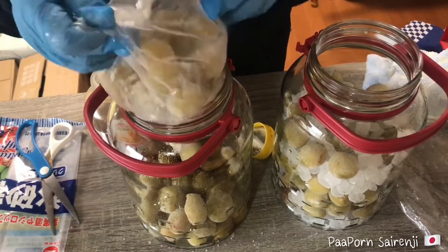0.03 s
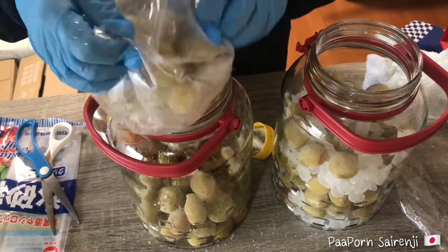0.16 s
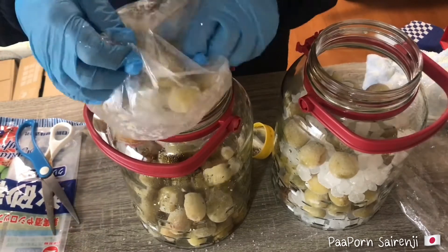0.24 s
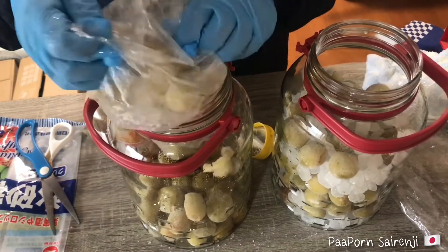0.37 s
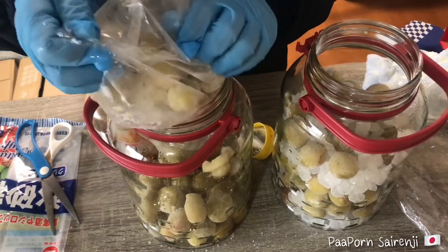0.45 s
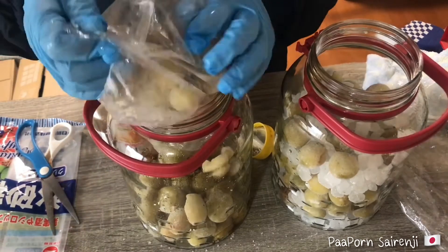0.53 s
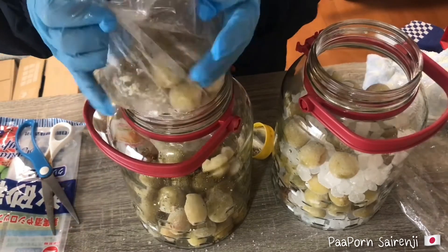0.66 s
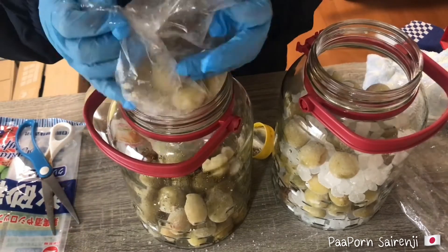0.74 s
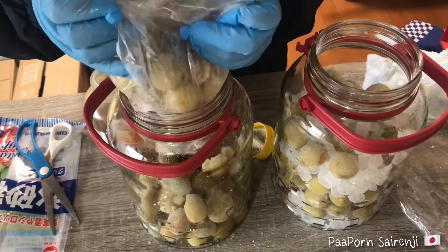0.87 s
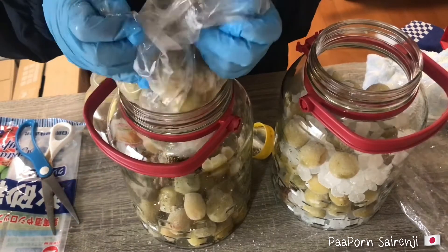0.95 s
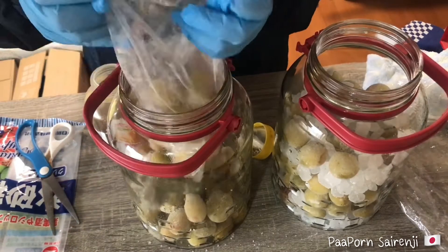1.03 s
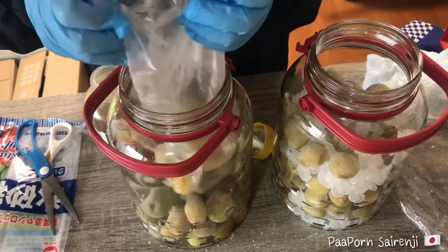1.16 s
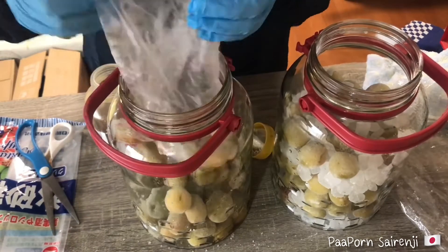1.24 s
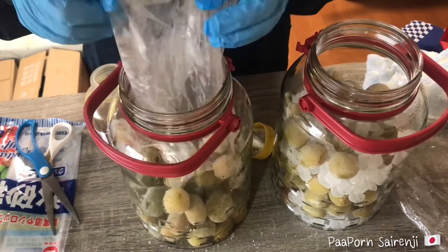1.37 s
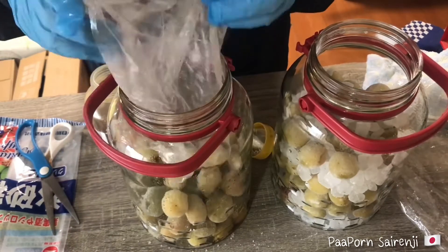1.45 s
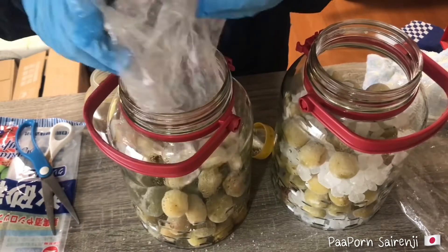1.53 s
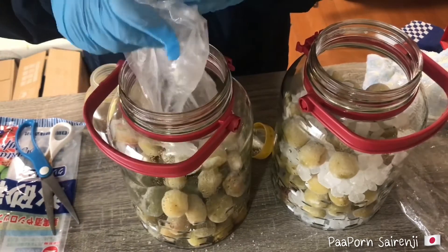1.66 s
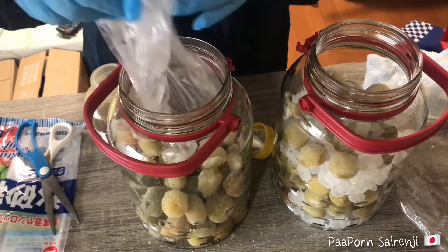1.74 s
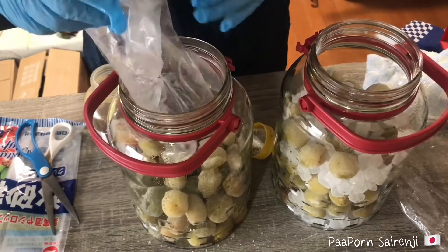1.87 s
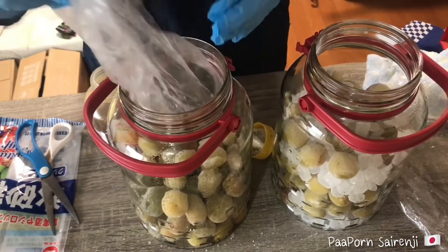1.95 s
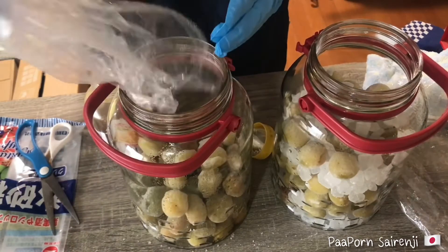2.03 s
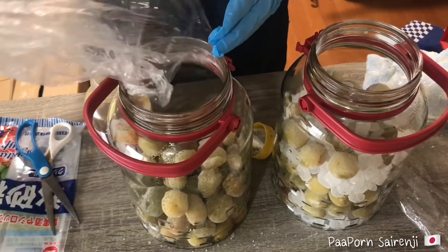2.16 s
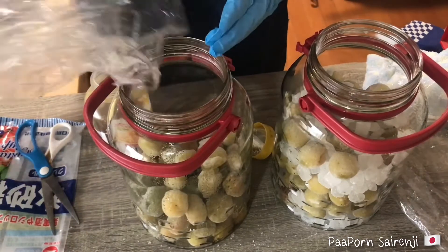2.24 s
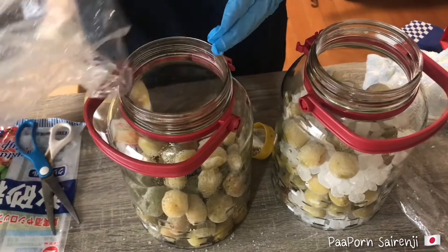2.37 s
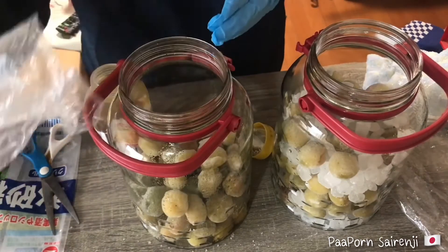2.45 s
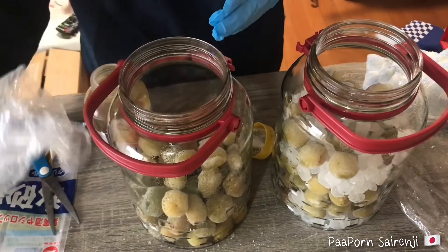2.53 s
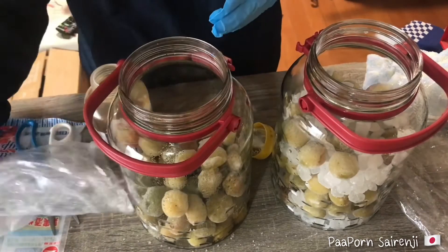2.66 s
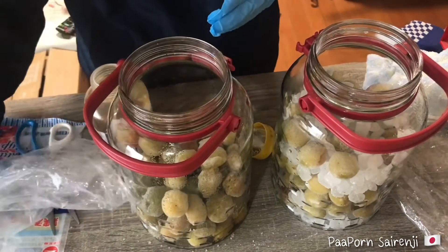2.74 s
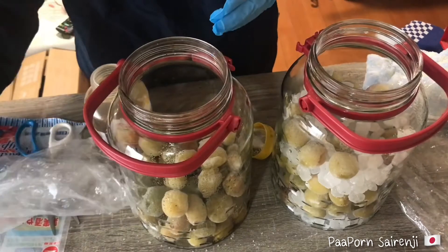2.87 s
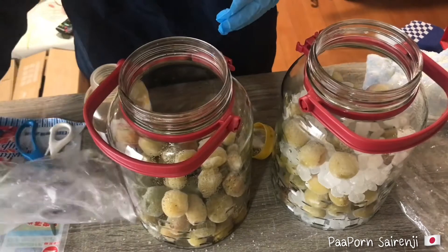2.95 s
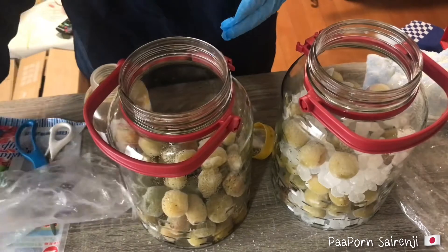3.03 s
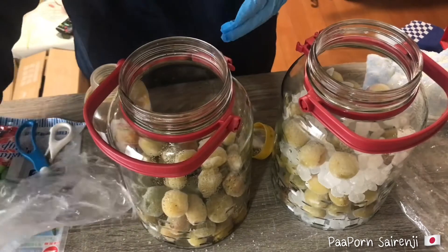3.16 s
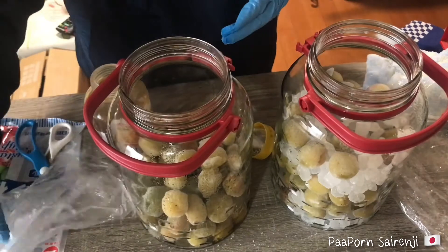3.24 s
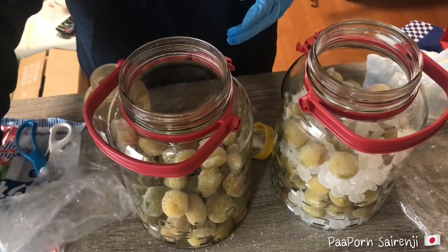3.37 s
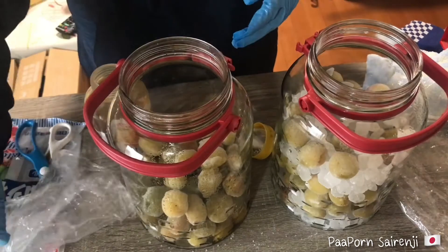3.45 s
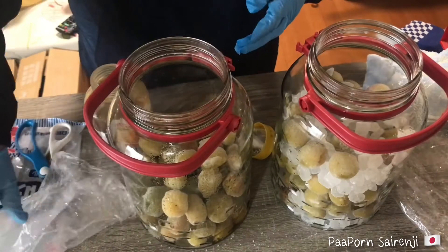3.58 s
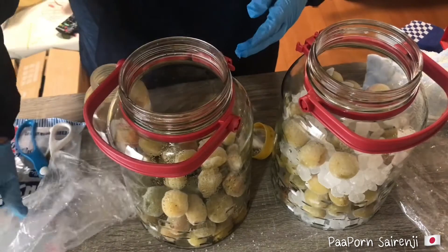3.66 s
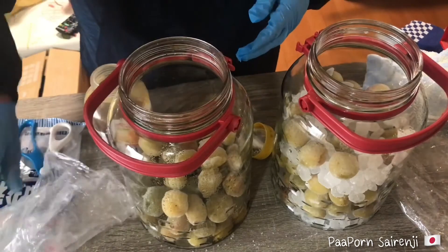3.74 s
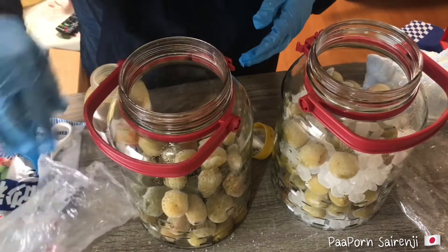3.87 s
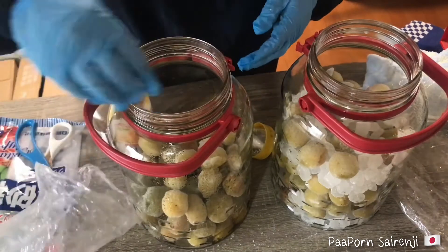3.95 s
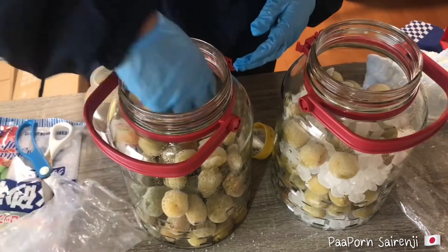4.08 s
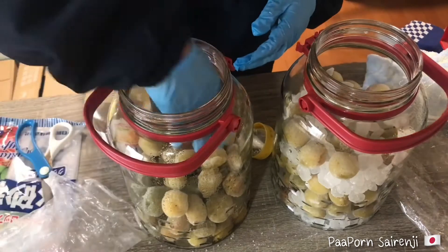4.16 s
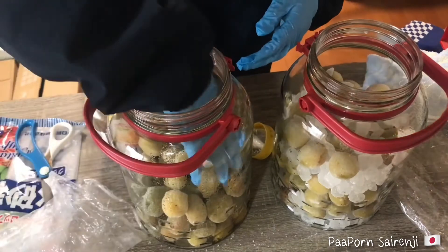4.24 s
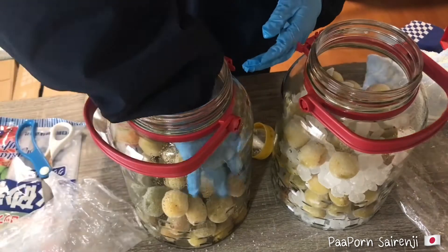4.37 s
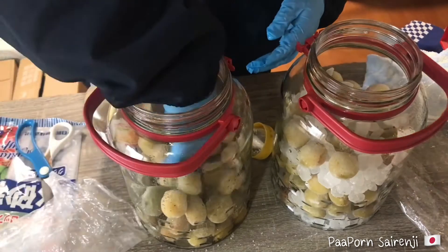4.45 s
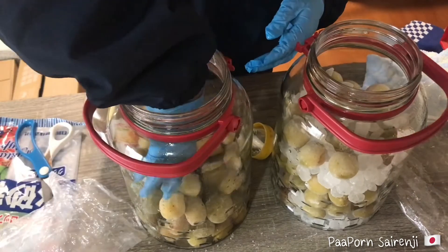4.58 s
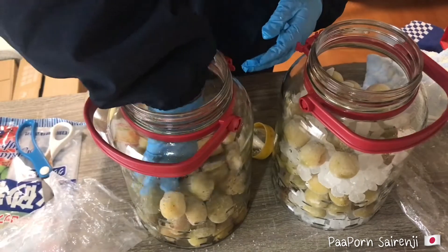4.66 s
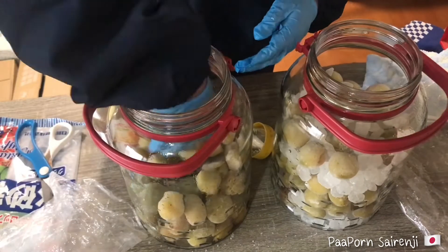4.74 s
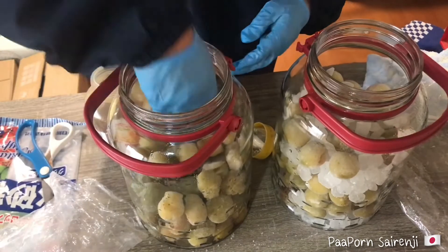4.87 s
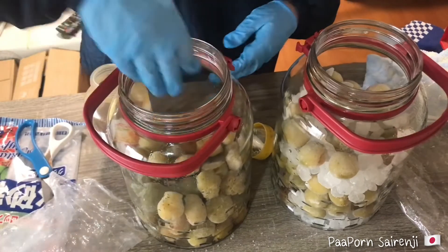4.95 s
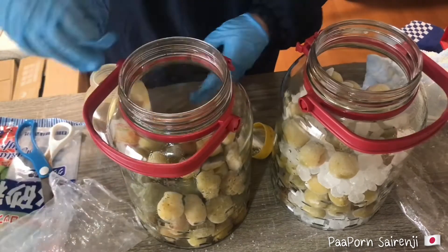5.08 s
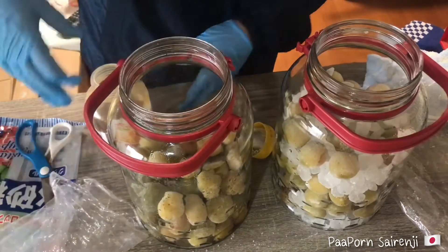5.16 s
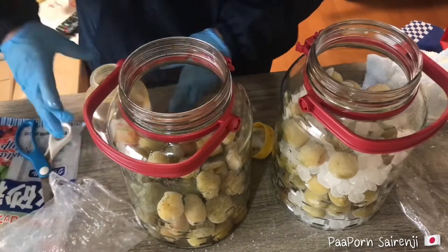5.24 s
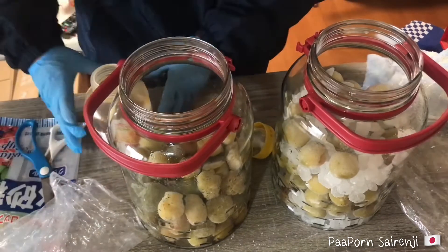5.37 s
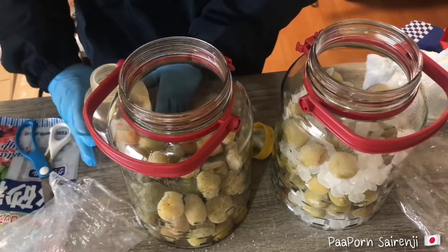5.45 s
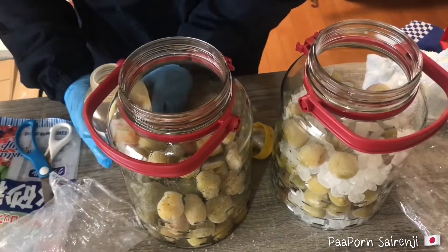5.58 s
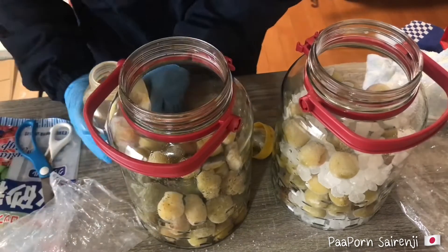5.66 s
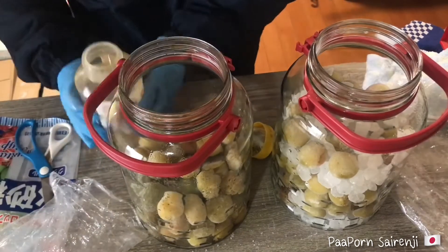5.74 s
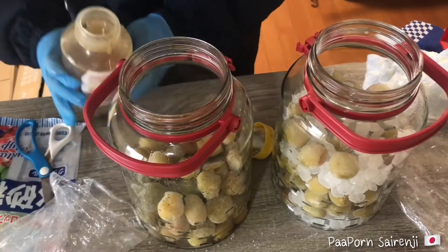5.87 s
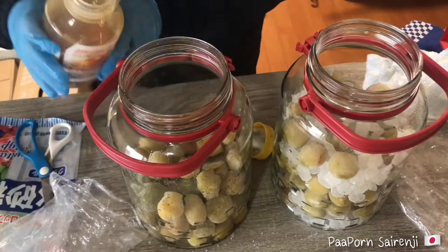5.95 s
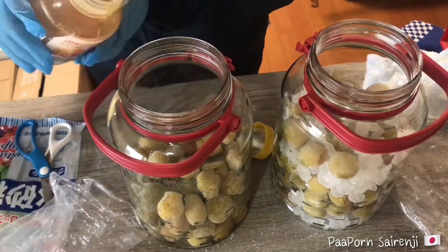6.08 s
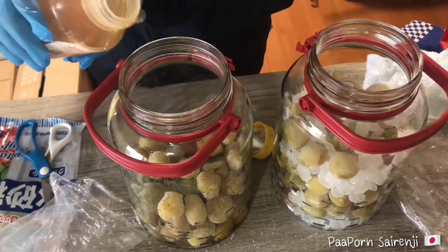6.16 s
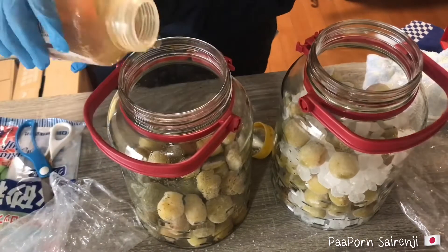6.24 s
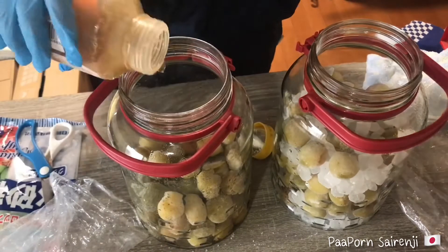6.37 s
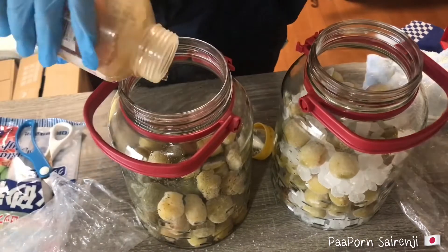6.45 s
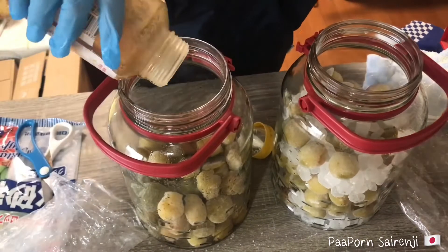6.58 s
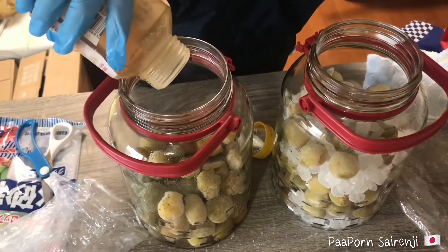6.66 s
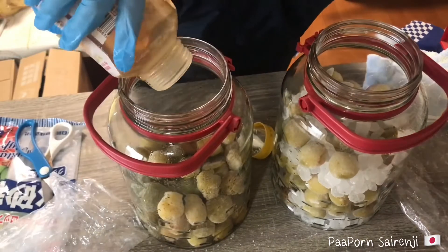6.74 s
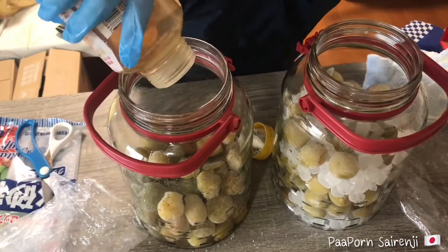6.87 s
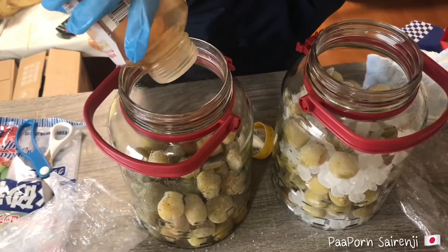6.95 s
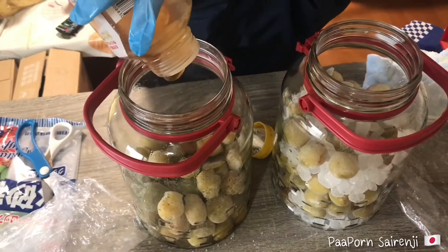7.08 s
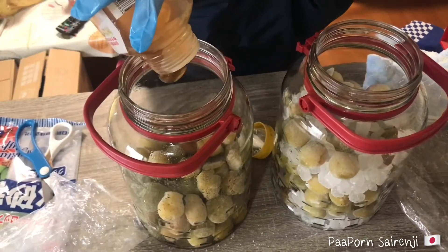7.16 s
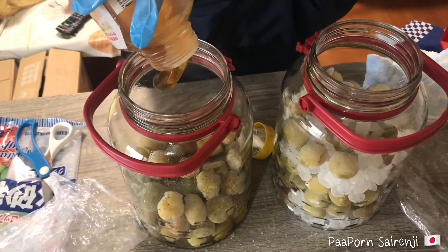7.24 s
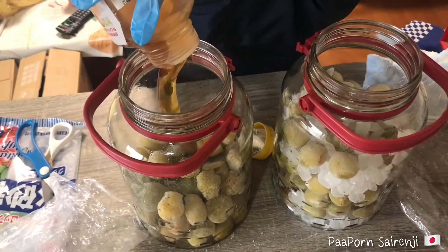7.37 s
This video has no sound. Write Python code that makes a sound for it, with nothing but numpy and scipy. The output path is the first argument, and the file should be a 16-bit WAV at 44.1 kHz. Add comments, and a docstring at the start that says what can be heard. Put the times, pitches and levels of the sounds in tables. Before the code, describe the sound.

Loud crinkling film comes first, with muffled rolling fruit inside it, then a burst of short knocks against thick glass just after one second. The crackle turns hollow in the jar's neck and fades to loose, quiet rustles. After a near-silent pause come soft bumps and a single rattling clack, cloth brushing, and small plastic bottle clicks. Close microphone, short kitchen reverberation, low steady room tone.

```python
"""Frozen fruit tumbles from a thin plastic bag into a big, half-filled glass jar on a kitchen table.
Each knock is a short clack over a weaker glass ring; filtered noise bursts make the soft bumps and rolling.
The bag crackles as random creases buckle, and sounds hollow in the neck as it is pulled out and laid aside.
A gloved hand levels the fruit with one more sharp knock, then picks up a plastic bottle that ticks in its grip.
The microphone hears it all with a short kitchen tail over a quiet background."""
import sys
import numpy as np
from scipy import signal
from scipy.fft import rfft, irfft
from scipy.io import wavfile
from scipy.ndimage import uniform_filter1d

SR = 44100
rng = np.random.default_rng(int(sys.argv[2]) if len(sys.argv) > 2 else 0)


def digitize_waveform(pressure):
    """Quantize a signal to 16-bit integers and store it at the path in sys.argv[1].

    Rows of a 2-D input are taken as channels; values are limited to [-1, 1].
    """
    field = np.atleast_2d(pressure).T
    bounded = np.clip(field, -1, 1)
    quanta = np.round(bounded * 32767).astype(np.int16)
    wavfile.write(sys.argv[1], SR, quanta)


N = 326775
TIME, FREQS = np.arange(N) / SR, np.fft.rfftfreq(N, 1 / SR)

# colour of the quiet kitchen: pitch_hz [Hz], level_db [dB, relative]
QUIET_COLOUR = [(15, -36.5), (25, -13.5), (53, -2.5), (117, -10), (157, -5.5), (200, -8), (263, -10.5),
                (285, -9), (451, -17), (560, -17.5), (2280, -23.5), (7000, -32), (16000, -36)]
# decay of the kitchen's reflections: pitch_hz [Hz], t60_s [s]
KITCHEN_DECAY = [(150, 0.2), (1000, 0.63), (4000, .38), (9000, 0.35), (16000, 0.073)]
# sleeves and gloves brushing smoothly: start_s [s], level_db [dB]
SLEEVE_LEVEL = [(3.9, -63.5), (4.95, -68.5), (5.04, -57.5), (5.2, -60), (5.4, -60.5), (6.1, -57),
                (6.7, -79)]
# colour of the brushing cloth: pitch_hz [Hz], level_db [dB, relative]
SLEEVE_COLOUR = [(300, 2), (1500, 0.5), (5000, -1.5), (10000, -5.5), (13000, -4.5), (16000, 0.5)]
# the bottle sliding off the table: start_s [s], level_db [dB, relative]
BOTTLE_SLIDE = [(5.6, -92), (5.635, -56), (5.665, -61), (5.71, -71)]
# the bag rubbing through the neck stirs the air in the jar:
# start_s [s], pitch_hz [Hz], level_db [dB, before scaling by effort]
NECK_HOLLOW = [(1.4, 264, -24), (1.75, 255, -29.5), (1.99, 240, -18), (2.25, 285, -25.5), (2.45, 315, -23)]
# each squeeze or tug of bag and gloves: start_s [s], hold_s [s], level_db [dB, relative]
GRIPS = [(.08, .05, -39.5), (.14, .07, -32.5), (.33, 0.047, -35), (.55, 0.067, -37), (.695, 0.062, -38),
         (.8, .13, -36), (.995, 0.17, -31.5), (1.225, .035, -36), (1.431, .04, -45.5), (1.51, .255, -39.5),
         (1.827, .025, -42), (1.92, 0.028, -42), (2.283, .018, -53.5), (2.415, .1, -51.5),
         (2.675, .1, -49.5), (3.055, .025, -51), (3.17, 0.054, -46.5), (3.25, 0.038, -49.5),
         (3.88, .012, -56.5), (3.985, 0.058, -51.5), (4.425, .17, -59), (5.475, .15, -56),
         (5.762, 0.037, -56), (5.905, .04, -57)]
# film sliding between grips: start_s [s], level_db [dB, relative]
FILM_SLIDING = [(0, -43.5), (.15, -40), (1.22, -39), (1.35, -48.5), (1.7, -47), (2.12, -57), (2.22, -67),
                (2.6, -59.5), (2.8, -53.5), (3.25, -53.5), (3.55, -61.5), (3.75, -73.5), (4.9, -75.5)]
# colour of the plastic film: pitch_hz [Hz], level_db [dB, relative]
FILM_COLOUR = [(280, -20), (380, -5), (850, -7), (1300, -3), (1850, -4), (4200, -3), (4900, -6), (6100, -6),
               (9300, -8), (10400, -10), (12000, -5.5), (16000, -4.5)]
# how taut the film is, higher being brighter: start_s [s], body_cut_db [dB, negative adds body]
FILM_TAUTNESS = [(0, 0), (1.1, -1.5), (1.6, 1), (2.1, -5), (4, -5.5), (4.6, -9.5), (5.2, -13), (5.55, -5.5)]
# loudest buckles of plastic, film or bottle wall: start_s [s], level_db [dB, relative], brightness_hz [Hz]
SNAPS = [(0.1316, -12, 5700), (0.2712, -14, 7200), (0.342, -13, 7200), (0.3546, -18, 10700),
         (0.4026, -19.5, 8300), (0.482, -17, 8300), (0.502, -17, 6800), (0.6212, -9.5, 6650),
         (0.693, -9.5, 7500), (0.732, -10, 4340), (0.8042, -15, 7200), (0.8195, -14, 6000),
         (1.0042, -13, 7500), (1.4683, -12, 7900), (2.176, -29.5, 4800), (2.686, -25, 5100),
         (2.8966, -24, 9000), (3.0531, -22.5, 6100), (3.2587, -28, 6320), (3.3447, -42, 3260),
         (3.4881, -35, 6650), (3.587, -28.5, 8000), (3.8827, -31, 4540), (4.021, -33.5, 4500),
         (5.485, -19.5, 11400), (5.6, -20.5, 8700), (5.7624, -29.5, 3700), (5.86, -31, 6400),
         (5.9058, -20, 8200), (5.9342, -26.5, 3900), (5.9609, -20, 5230), (6.405, -30.5, 6300),
         (7.1538, -18, 4500), (7.2823, -38.5, 9540)]
# colour of rolling fruit: pitch_hz [Hz], level_db [dB, relative]
TUMBLE_COLOUR = [(40, -31.5), (70, -14), (105, -4.5), (160, -3), (220, -2), (330, -7), (450, -15.5),
                 (900, -17.5), (1500, -14.5), (4000, -24), (16000, -78.5)]
# soft bumps of fruit, hand and bottle: start_s [s], level_db [dB, relative], weight_hz [Hz]
THUDS = [(0.194, -22.5, 630), (0.871, -27, 417), (1.036, -29, 360), (1.207, -19, 806), (3.982, -36, 302),
         (4.423, -29, 537), (4.474, -28, 520), (4.525, -28, 400), (4.597, -32.5, 800), (4.633, -29, 745),
         (4.699, -28, 416), (4.826, -42, 400), (4.843, -41.5, 500), (4.992, -32, 645), (5.097, -36.5, 400),
         (6.382, -39, 228), (6.533, -48.5, 190)]
# colour of a soft bump: pitch_hz [Hz], level_db [dB, relative]
THUD_COLOUR = [(50, -27), (100, -2.5), (220, -4.5), (350, -6), (500, -5), (900, 0.5), (1400, 4),
               (3000, -22.5), (10000, -52.5)]
# resonances of the table under the jar: pitch_hz [Hz], width_hz [Hz], level_db [dB]
TABLE_MODES = [(104, 24, -1.5), (181, 24, -2), (344.2, 30, 5.5)]
# modes of the loaded jar: pitch_hz [Hz], level_db [dB, relative], t60_s [s, undamped]
GLASS_MODES = [(1349, -11.5, 0.17), (1560, -11, 0.12), (1695, 1, 0.15), (1840, -9, .1), (1974, 5.5, 0.13),
               (2033, 0, 0.21), (2130, -16.5, 0.37), (2436, -18, 0.069), (2540, -16, 0.24),
               (2782, -1.5, 0.16), (2650, 4.5, 0.24), (3780, -12, .14), (3863, 5, 0.12), (3830, -8.5, 0.14),
               (4350, -5.5, 0.076), (5380, -13, 0.13), (5480, -8, 0.31), (6730, -15, .24),
               (7200, -7.5, .32), (11500, -23.5, .12)]
# fruit striking the glass: start_s [s], peak_db [dB, dry], contact_hz [Hz, highest pitch excited],
# ring_db [dB, relative], rattle_s [s, how long it rattles on]
KNOCKS = [(0.192, -12, 2140, -3, .03), (0.845, -17, 2080, -7, 0), (0.959, -11.5, 3380, 2.5, .015),
          (1.093, -16.5, 2100, 2, 0), (1.126, -8.5, 3600, 3.5, .045), (1.175, -11, 2400, 12.5, 0),
          (1.1951, -1.5, 3600, -1.5, 0), (1.2225, -5, 6000, 2.5, .015), (1.296, -4, 2013, -15, 0),
          (1.449, -18.5, 2190, -6, 0), (4.443, -21, 1906, -1, 0), (4.4755, -19, 1900, -6, 0),
          (4.514, -6, 11000, -4.5, .07), (4.597, -20, 2000, -9, 0), (4.632, -26, 1890, -13, 0),
          (4.7, -32, 1600, -11, .03)]

QUIET_DB, EDGE_HZ = -60, 16100
# the bag is drawn out of the neck; the hollow follows the effort in dB per dB
PULL_START_S, PULL_HOLD_S, PULL_EDGE_S, HOLLOW_FOLLOW = 1.5, 0.92, .06, 0.56
# a grip builds quickly, then the film relaxes
GRIP_RISE_S, GRIP_RELEASE_S = 0.0086, .017
# fruit rolls while the bag that holds it is shaken; the level is relative to the handling
BAG_EMPTY_S, EMPTYING_S, SHAKEN_DB = 1.7, 0.18, -11.5
# it also stirs around every bump: STIR_DB at a bump of STIR_BUMP_DB, spread in time, dB per dB of bump
STIR_BUMP_DB, STIR_DB, STIR_S, STIR_FOLLOW = -25, -44.5, 0.041, 1.3
# most of the fruit drops at once
POUR_START_S, POUR_HOLD_S, POUR_RISE_S, POUR_SETTLE_S, POUR_DB = 1.092, .12, 0.29, 0.13, -41.5
HAND_IN_S, HAND_OUT_S = 4.15, 4.95  # the hand is in the jar between these times
# a rattling fruit comes back in softer contacts, all of one medium hardness
REBOUND_GAP_S, REBOUND_LOSS_DB, REBOUND_FADE_DB_PER_S, REBOUND_HZ = .0125, 10, 141.5, 2200


def amp(db):
    """Decibels to gain."""
    return 10 ** (np.asarray(db) / 20)


def unit(x):
    """Scales to rms 1."""
    return x / np.sqrt(np.mean(x ** 2) + 1e-20)


def read(points, hz):
    """Reads a spectrum on a log-frequency axis."""
    f, value = np.transpose(points)
    return np.interp(np.log(hz + 1), np.log(f + 1), value)


def follow(rows, axis=1):
    """One column of a curve at every sample."""
    rows = np.array(rows)
    return np.interp(TIME, rows[:, 0], rows[:, axis])


def loudness(rows):
    """Gain along a level curve, silent outside it, with softened ends."""
    inside = (TIME >= rows[0][0]) & (TIME <= rows[-1][0])
    return amp(follow(rows)) * abs(uniform_filter1d(inside * 1., size=400))


def swell(start, hold, rise_s, release_s):
    """Attack, hold and release of one movement."""
    before = np.maximum(start - TIME, 0)
    after = np.maximum(TIME - start - hold, 0)
    return np.exp(-before / rise_s - after / release_s)


def add(mix, s, sound):
    """Mixes a sound in at time s."""
    part = mix[max(round(s * SR), 0):][:len(sound)]
    part += sound[:len(part)]


def colour(x, points):
    """Filters by a spectrum."""
    return irfft(rfft(x) * amp(read(points, FREQS)), N)


def click(gain_db, size=2048):
    """The shortest causal (minimum-phase) pulse with the spectrum gain_db(Hz)."""
    hz = abs(np.fft.fftfreq(size, 1 / SR)) + 1
    log_gain = np.log(amp(np.maximum(gain_db(hz), -100)))
    spectrum = np.exp(np.conj(signal.hilbert(log_gain)))
    return np.fft.ifft(spectrum).real[:size // 2]


def blow(noise, after_db, after_s):
    """One impulse followed by a dying rattle."""
    t = np.arange(len(noise)) / SR
    rattle = noise * np.exp(-t / after_s) * (t > 0)
    return (t == 0) + amp(after_db) * rattle / np.linalg.norm(rattle)


def resonate(x, hz, width_hz):
    """A resonance of gain 1 that can follow a pitch curve."""
    turn = np.exp(2j * np.pi * np.cumsum(hz * np.ones(N)) / SR)
    r = np.exp(-np.pi * width_hz / SR)
    # shift the pitch to zero, smooth, and shift back
    return 2 * (turn * signal.lfilter([1 - r], [1, -r], x / turn)).real


def rubbing(gain, hz, width_hz):
    """Friction noise passed twice through one hollow resonance."""
    once = resonate(rng.standard_normal(N), hz, width_hz)
    return gain * unit(resonate(once, hz, width_hz))


def sparks(per_s, spread_db):
    """Random impulses of either sign, most small and a few large; same power at any rate."""
    size = amp(spread_db * np.minimum(rng.exponential(1, N), 3.6))
    sign = rng.choice([-1, 1], N)
    return size * sign * (rng.random(N) < per_s / SR) / np.sqrt(per_s)


def quiet_kitchen():
    """Steady coloured noise, the background of the place."""
    return amp(QUIET_DB) * unit(colour(rng.standard_normal(N), QUIET_COLOUR))


def kitchen(x, tail_db):
    """Adds sparse reflections from table, jars and small room, strongest early and fading by pitch."""
    t = np.arange(SR // 2) / SR
    taps = rng.choice([-1., 1.], len(t)) * (rng.random(len(t)) < 6000 / SR) * (t > .003)
    early = 1 + 2.0 * np.exp(-t / 0.013)
    hz, age, z = signal.stft(taps * early, SR, nperseg=256)
    decay = amp(-60 * age / read(KITCHEN_DECAY, hz)[:, None])
    tail = signal.istft(z * decay, SR, nperseg=256)[1]
    return x + amp(tail_db) * signal.fftconvolve(x, tail / np.linalg.norm(tail))[:N]


def sleeves():
    """Cloth and gloves brush as smooth coloured noise."""
    return loudness(SLEEVE_LEVEL) * unit(colour(rng.standard_normal(N), SLEEVE_COLOUR))


def bottle_slide():
    """Friction of the bottle leaving the table sounds through one resonance."""
    return rubbing(amp(6.0) * loudness(BOTTLE_SLIDE), hz=494, width_hz=136)


def neck_hollow(motion):
    """The bag rubbing through the neck drives a hollow resonance of moving pitch."""
    pull = swell(PULL_START_S, PULL_HOLD_S, PULL_EDGE_S, PULL_EDGE_S)
    gain = amp(follow(NECK_HOLLOW, axis=2)) * motion ** HOLLOW_FOLLOW * pull
    return rubbing(gain, follow(NECK_HOLLOW), width_hz=117)


def handling():
    """How hard the film is worked: the separate grips over film sliding."""
    grips = sum((amp(db) * swell(s, hold, GRIP_RISE_S, GRIP_RELEASE_S)) ** 2 for s, hold, db in GRIPS)
    return np.sqrt(grips + loudness(FILM_SLIDING) ** 2)


def bag(motion, creases_per_s=200, crowding=.65, spread_db=5.5, clump_db=0.44, facet_db=10,
        facet_octaves=0.45, flutter_db=-3, rub_db=-9, level_db=-1, count=16):
    """Facets of film buckle in clumps, each with its own colour, over the dull hiss of film sliding on film."""
    # slow handling leaves gaps between creases
    per_s = creases_per_s * (motion / motion.max()) ** crowding + 10
    crackle = np.zeros(N)
    for facet_hz in np.geomspace(700, 15000, count):
        facet = click(lambda f: facet_db * np.exp(-(np.log2(f / facet_hz) / facet_octaves) ** 2))
        flutter = blow(rng.standard_normal(250), after_db=flutter_db, after_s=0.0041)
        crease = np.convolve(facet, flutter)
        crackle += signal.oaconvolve(sparks(per_s, spread_db), crease)[:N]
    rub = colour(rng.standard_normal(N), [(1500, 2.5), (4000, -2), (12000, -1.5)])
    wander = uniform_filter1d(uniform_filter1d(rng.standard_normal(N), size=260), size=120)
    clumps = np.clip(unit(wander), -2, 2)
    film = colour(unit(crackle * amp(clump_db * clumps)) + amp(rub_db) * rub, FILM_COLOUR)
    # level is set by the treble band
    treble = irfft(rfft(film) * ((FREQS > 6000) & (FREQS < 15000)), N)
    film /= np.std(treble)
    # taut film is bright; slack film flaps with more body
    body = colour(film, [(3000, -2.5), (6000, -4.5), (11000, -19.5)])
    return amp(level_db) * motion * (film + body * (amp(-follow(FILM_TAUTNESS)) - 1))


def snaps(below_db=6.0, above_db=8, flutter_db=-3, flutter_s=0.0013, level_db=1):
    """A crease flips over with one sharp pulse, and the sheet flutters for a moment."""
    out = np.zeros(N)
    for (s, db, hz), noise in zip(SNAPS, rng.standard_normal((len(SNAPS), 600))):
        # the spectrum falls away on both sides of the brightness
        pulse = click(lambda f: -np.where(f < hz, below_db, above_db) * abs(np.log2(f / hz)) ** 1.5)
        flutter = blow(noise, flutter_db, flutter_s)
        add(out, s, amp(db + level_db) * np.convolve(flutter, pulse / abs(pulse).max()))
    return out


def tumble(motion, bumps_per_s=260, spread_db=3):
    """Many small bumps as the fruit rolls in the shaken bag and shifts in the heap."""
    bump = click(lambda f: read(TUMBLE_COLOUR, f))
    bumps = signal.oaconvolve(sparks(bumps_per_s, spread_db), bump)[:N]
    emptying = np.exp(-np.maximum(TIME - BAG_EMPTY_S, 0) / EMPTYING_S)
    shaken = amp(SHAKEN_DB) * motion * emptying
    stirred = np.zeros(N)
    for s, db, _ in THUDS:
        stir_db = STIR_DB + STIR_FOLLOW * (db - STIR_BUMP_DB)
        stirred += (amp(stir_db) * swell(s, 0, STIR_S, STIR_S)) ** 2
    pour = amp(POUR_DB) * swell(POUR_START_S, POUR_HOLD_S, POUR_RISE_S, POUR_SETTLE_S)
    return unit(bumps) * np.sqrt(shaken ** 2 + stirred + pour ** 2)


def thuds(settle_s=0.008, rattle_db=0, reach=1.1, level_db=-1):
    """A dull push followed by the heap settling, which takes longer after a heavy, low one."""
    out = np.zeros(N)
    for (s, db, hz), noise in zip(THUDS, rng.standard_normal((len(THUDS), SR // 4))):
        push = click(lambda f: read(THUD_COLOUR, f) - 10 * np.log10(1 + (f / (reach * hz)) ** 4))
        settling = blow(noise, rattle_db, settle_s * 500 / hz)  # settle_s holds at 500 Hz
        add(out, s, amp(db + level_db) * signal.fftconvolve(settling, push / abs(push).max()))
    return out


def table(bumps):
    """The bumps set off the resonances of the table under the jar."""
    return sum(amp(db) * resonate(bumps, hz, width_hz) for hz, width_hz, db in TABLE_MODES)


def contacts(count=6):
    """Every knock and its uneven rebounds: start_s, peak_db, contact_hz, ring_db."""
    rows = []
    unevenness = rng.uniform(-.25, .25, (len(KNOCKS), count))
    for (s, db, hz, ring_db, rattle_s), uneven in zip(KNOCKS, unevenness):
        rows.append((s, db, hz, ring_db))
        rebounds = min(int(rattle_s / REBOUND_GAP_S), count - 1)
        for k in range(1, rebounds + 1):
            late = (k + uneven[k]) * REBOUND_GAP_S
            late_db = db - REBOUND_LOSS_DB - REBOUND_FADE_DB_PER_S * late
            rows.append((s + late, late_db, REBOUND_HZ, ring_db))
    return rows


def jar(place_db=0.5, clack_db=3, clack_t60=.025, ring_db=-10, glove_damping=0.18, rise_cycles=4,
        tick_db=-6, tick_s=0.0023, chatter_db=5, chatter_s=0.0044):
    """Each fruit gives a short clack and a weaker lasting ring; soft contacts favour the low modes."""
    out, t = np.zeros(N), np.arange(SR // 2) / SR
    hz, mode_db, t60 = np.transpose(GLASS_MODES)[:, :, None]
    hits = contacts()
    places = rng.standard_normal((len(hits), 3, len(GLASS_MODES), 1))
    grits = rng.standard_normal((len(hits), len(t)))
    for (s, db, contact_hz, free_db), (place, shift, phase), grit in zip(hits, places, grits):
        weight = amp(mode_db + place_db * place) / np.sqrt(1 + (hz / contact_hz) ** 8)
        # an arm in the neck damps the low bending modes
        held = HAND_IN_S < s < HAND_OUT_S
        life = t60 * np.where(held & (hz < 5000), glove_damping, 1)
        # fruit pressed on the wall detunes the modes and soaks up most of the blow at once
        clack_wave = np.sin(2 * np.pi * (hz + 70 * shift) * t + np.pi * phase)
        clack = amp(clack_db - 60 * t / clack_t60) * clack_wave
        ring_wave = np.sin(2 * np.pi * (hz + 6 * shift) * t + np.pi * phase)
        ring = amp(ring_db + free_db - 60 * t / life) * ring_wave
        onset = 1 - np.exp(-t * contact_hz / rise_cycles)
        knock = (weight * (clack + ring)).sum(0) * onset
        # the icy skin of the fruit adds a gritty crack
        skin = signal.butter(2, contact_hz, fs=SR)
        knock += amp(tick_db) * signal.lfilter(*skin, grit * np.exp(-t / tick_s))
        # neighbours in the heap chatter against each other
        heap = signal.butter(2, [1300, 1400 + contact_hz / 2], "band", fs=SR)
        chatter = signal.lfilter(*heap, grit[::-1])
        knock += amp(chatter_db) * chatter * np.exp(-t / chatter_s) * (1 - np.exp(-t / tick_s))
        add(out, s, amp(db) * knock / abs(knock).max())
    return out


def scene():
    """All the handling, heard in the kitchen over its quiet background."""
    motion = handling()
    plastic = kitchen(bag(motion), tail_db=-11.5) + kitchen(snaps(), tail_db=-11.5)
    bumps = thuds() + tumble(motion)
    fruit = kitchen(jar(), tail_db=-10.5) + kitchen(bumps + table(bumps), tail_db=-4.5)
    friction = neck_hollow(motion) + bottle_slide() + sleeves()
    return (plastic + fruit + friction + quiet_kitchen())[None]


def record(dry):
    """The band limit of the recorder: a steep low-pass."""
    low_pass = signal.firwin(511, EDGE_HZ, window=("kaiser", 9), fs=SR)
    return signal.oaconvolve(dry, low_pass[None], "same")


dry = scene()
out = record(dry)
digitize_waveform(out)
```